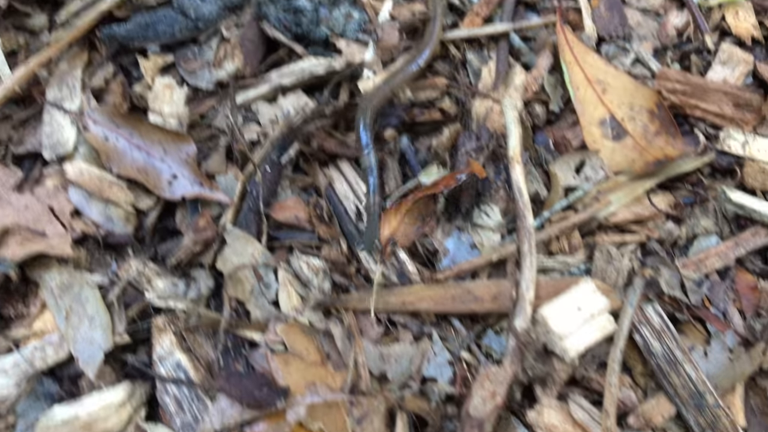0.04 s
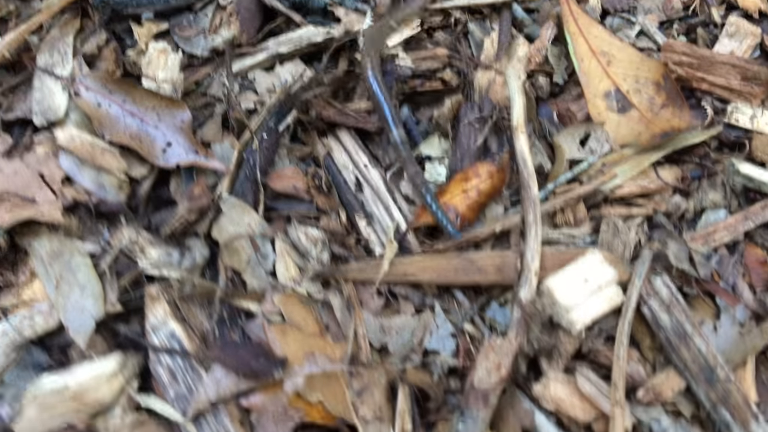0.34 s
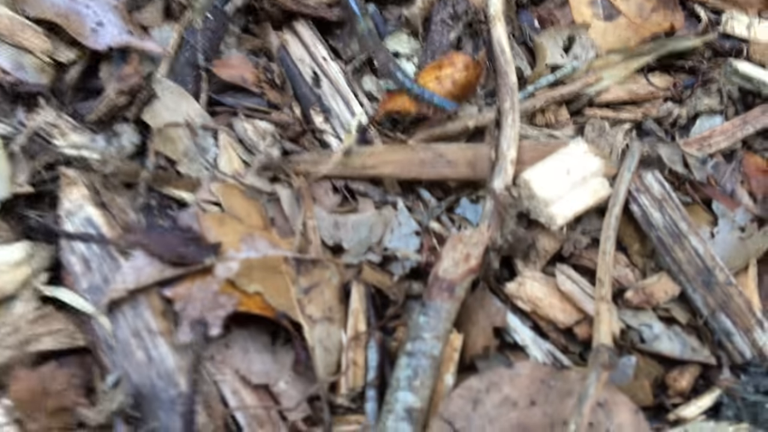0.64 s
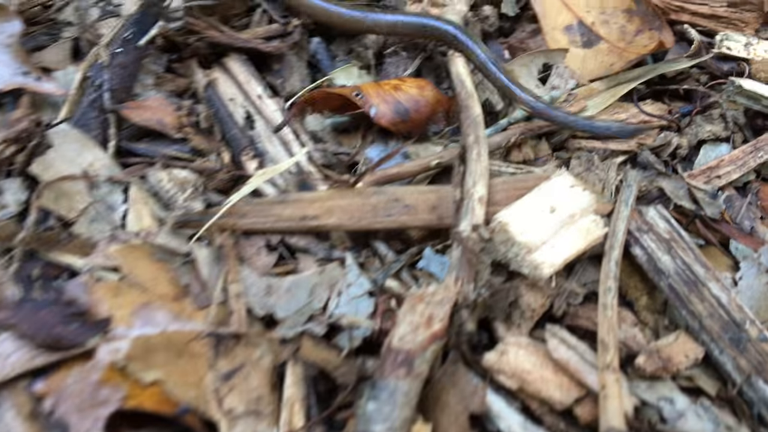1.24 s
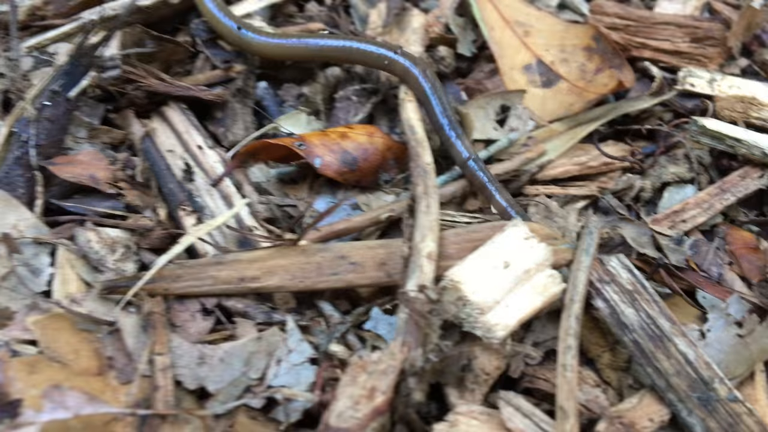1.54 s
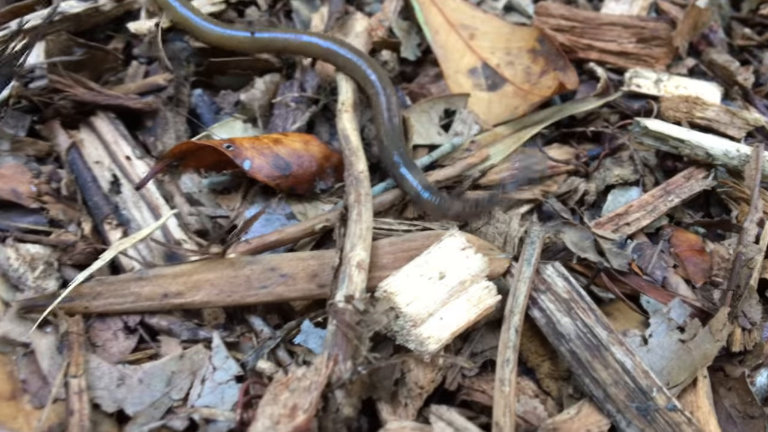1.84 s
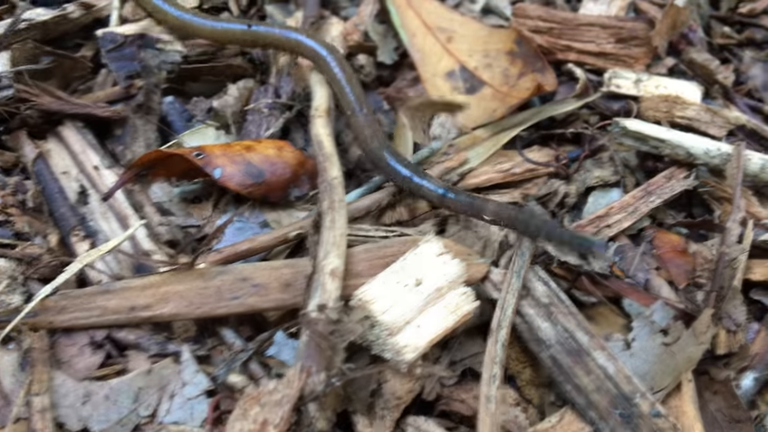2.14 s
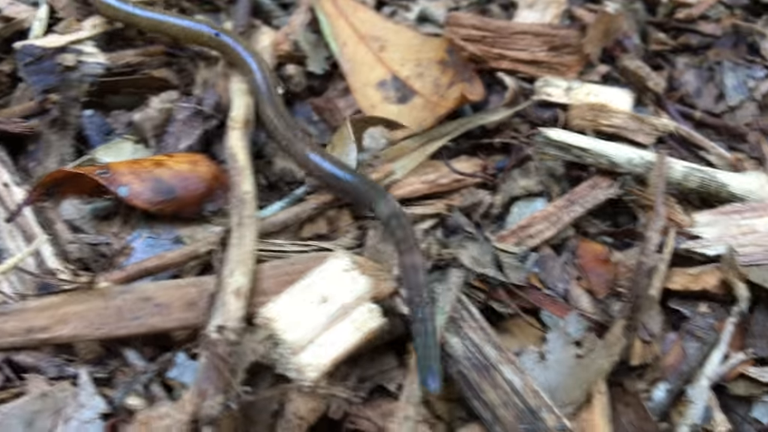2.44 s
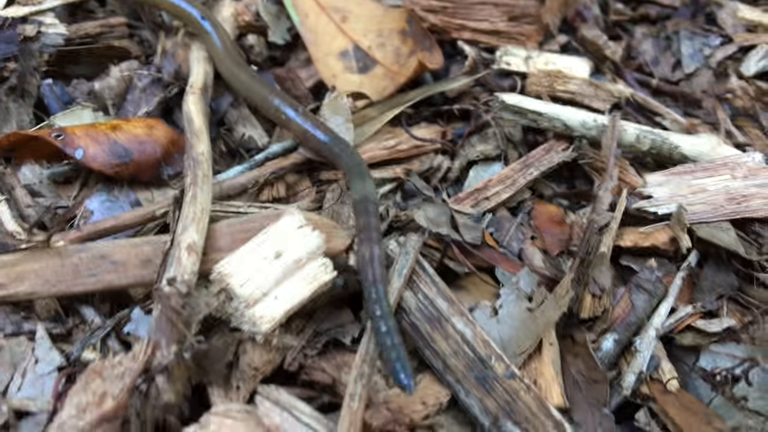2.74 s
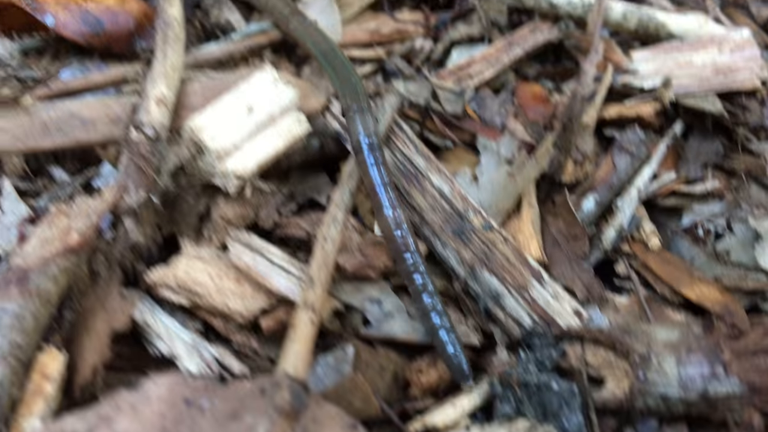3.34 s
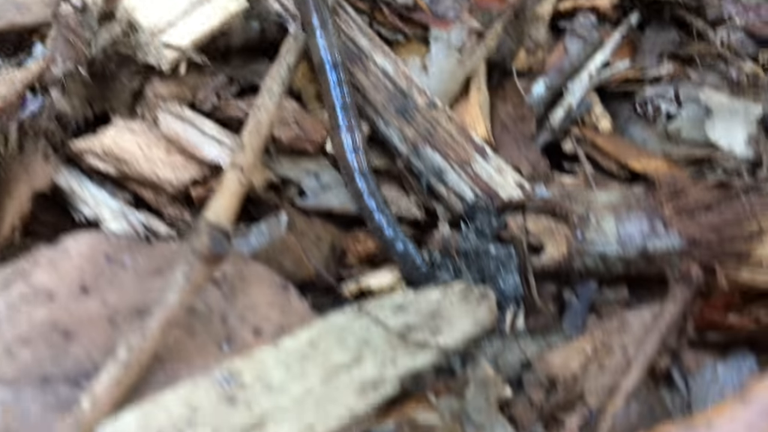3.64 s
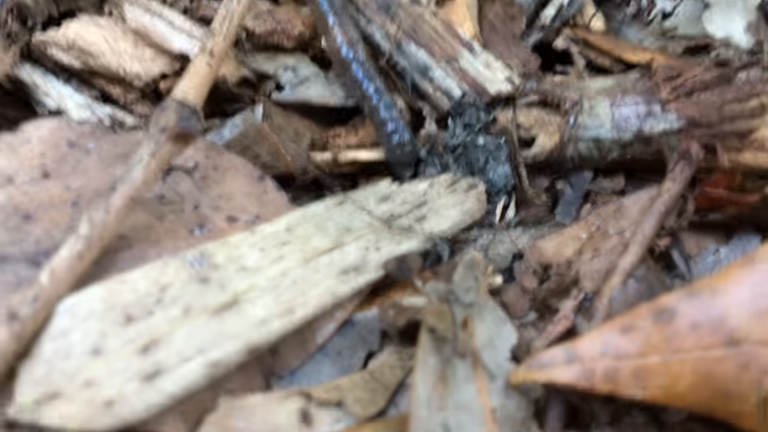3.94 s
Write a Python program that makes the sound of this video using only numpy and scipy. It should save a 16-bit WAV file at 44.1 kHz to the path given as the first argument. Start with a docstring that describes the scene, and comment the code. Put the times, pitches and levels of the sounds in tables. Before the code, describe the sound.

Faint crackles of leaf litter come in short bursts as a small creature crawls over the ground. A few dull clicks from the grip land close to the microphone early on, and far traffic slowly swells with a wavering engine drone.

```python
"""Dry leaves and wood chips tick and rustle faintly, in short bursts, under a thin, snake-like crawler:
stiff edges snap, and sliding leaves catch and slip. Close up, the grip on a hand-held camera slips
and knocks a few dull clicks out of its case. Behind them distant traffic rumbles and slowly swells,
with a wavering engine drone and tyre noise. A soft midrange hiss fades away from the start."""
import sys
import numpy as np
from scipy import signal
from scipy.fft import rfft, irfft
from scipy.io import wavfile

SR = 44100
rng = np.random.default_rng(int(sys.argv[2]) if len(sys.argv) > 2 else 0)


def materialize(psi):
    """Save the field psi as 16-bit PCM at rate SR to the path in sys.argv[1].

    A 1-D psi becomes a single channel; in a 2-D psi each row is a channel.
    """
    bounded = np.clip(np.atleast_2d(psi).T, -1, 1)
    quanta = np.round(bounded * 32767).astype(np.int16)
    wavfile.write(sys.argv[1], SR, quanta)


N = 176400
TIME = np.arange(N) / SR

# Single snaps in the leaf litter: start_s, level_db, ring_share (0-1), ring_hz
LEAF_SNAPS = [(0.042, -50, .9, 12500), (0.048, -61, .7, 13000), (.0617, -56, .9, 12800),
              (.0864, -56, .9, 12800), (.1452, -59, .9, 12400), (.1959, -52, .5, 12500),
              (0.2524, -56, .8, 14000), (.622, -61, .8, 13000), (.994, -56, .5, 12000),
              (1.012, -61, .4, 12000), (1.028, -55, .6, 13500), (1.276, -57, .5, 12000),
              (1.5955, -49, .45, 9600), (1.841, -52, 0, 9500), (1.8502, -50, .35, 9500),
              (2.272, -55, .7, 13000), (2.2774, -54, .6, 13000), (2.3059, -58, .8, 14000),
              (2.6121, -47, .68, 12500), (2.7595, -42, .62, 12400), (2.778, -48, .75, 12200),
              (2.7938, -50, .7, 13500), (2.8463, -51, .25, 7000), (2.899, -50, .3, 13000),
              (2.9306, -48.5, .7, 12200), (3.0405, -44, .82, 4200), (3.0435, -50, .8, 14000),
              (3.091, -44.5, .72, 12700), (3.251, -43, .92, 12400), (3.4467, -48, .85, 11500)]
# EQ of a snap's broad crackle: freq_hz, gain_db
CRACKLE_EQ = [(2400, -9), (3700, 0), (5000, 0), (7000, -1), (9600, -4), (10500, -21), (12500, -14),
              (16000, -27)]
def leaf_ticks(t60_s=.007, ring_width_hz=2200):
    """A dry edge or twig snaps: a tiny burst, part broad crackle and part thin ring at its own pitch."""
    t = TIME[:SR // 50]
    crackle, rings = np.zeros(N), np.zeros(N)
    for start_s, level_db, ring_share, ring_hz in LEAF_SNAPS:
        snap = rng.standard_normal(len(t)) * from_db(-60 * t / t60_s)
        snap = from_db(level_db) * snap / np.abs(snap).max()
        ring = resonance(snap, ring_hz, ring_width_hz)
        add(crackle, start_s, (1 - ring_share) * snap)
        add(rings, start_s, ring_share * snap.std() * unit_rms(ring))
    return equalise(crackle, CRACKLE_EQ) + rings


# Short slides of leaf on leaf: start_s, length_s, level_db, crisp_relative_db
LEAF_SLIDES = [(0.95, 0.11, -75.5, -9), (1.834, 0.032, -69, -7), (2.206, 0.23, -73, -15),
               (2.381, 0.05, -67, -23), (2.47, 0.18, -77.5, -13), (2.746, 0.052, -63.5, -5.5),
               (2.785, 0.085, -70.5, -4.5), (2.876, 0.066, -71.5, -3.5), (3.032, 0.024, -71, -5),
               (3.056, 0.04, -69.5, -3.5)]
# EQ of a rustle's body: freq_hz, gain_db
RUSTLE_EQ = [(1500, -2), (3300, 10.5), (5000, 2), (7000, 0), (9500, -8), (10500, -14), (16000, -17)]
# EQ of its crisp top, from stiff leaf edges: freq_hz, gain_db
CRISP_EQ = [(7500, -13), (9500, -6), (10600, -17), (11600, -9), (12300, 2), (13200, -8), (14200, -4),
            (16000, -11)]
def leaf_rustles(clumps_per_s=220, clump_depth_db=3.2):
    """Leaves slide over each other in short swells; they catch and slip, so the grains come in clumps."""
    body, crisp = np.zeros(N), np.zeros(N)
    for start_s, length_s, level_db, crisp_db in LEAF_SLIDES:
        swell = np.sin(np.pi * np.clip((TIME - start_s) / length_s, 0, 1))
        body += from_db(level_db) * swell
        crisp += from_db(level_db + crisp_db) * swell
    slips = np.clip(rng.standard_normal(N), -2, 2)
    clump_db = clump_depth_db * np.interp(TIME * clumps_per_s, np.arange(N), slips)
    clumps = unit_rms(from_db(clump_db))
    return (equalise(body * clumps * leaf_grains(), RUSTLE_EQ)
            + equalise(crisp * clumps * leaf_grains(), CRISP_EQ))


def leaf_grains(per_s=6000, spread_db=3):
    """Tiny fractures of uneven size at random times, at unit RMS."""
    sizes = from_db(spread_db * np.minimum(rng.exponential(1, N), 4))
    signs = rng.choice([-1, 1], N)
    return unit_rms(sizes * signs * (rng.random(N) < per_s / SR))


# Slips of the grip: start_s, level_db, edge_relative_db, edge_cutoff_hz, mid_gain_db
GRIP_SLIPS = [(0.0303, -31, -11, 8700, -1), (0.0616, -32.5, -15.5, 7500, -3), (0.1451, -35, -15, 6400, -4),
              (0.1893, -37, -14, 7200, 2), (0.2487, -37.5, -10.5, 7500, -2),
              (0.5154, -32, -14.5, 10600, -2), (1.5314, -33, -15, 7800, -16),
              (2.2891, -36.5, -21, 10500, -20)]
# EQ of a click's dull body: freq_hz, gain_db
KNOCK_EQ = [(400, -20), (700, -8), (1000, 0), (1400, -0.5), (1800, 2.5), (2350, 0), (2950, -11.5),
            (3500, -11.5), (4400, -21.5), (6000, -29)]
# EQ of its sharp edge: freq_hz, gain_db
EDGE_EQ = [(3000, -8), (3600, -14), (4200, -17), (4800, -23), (5500, 2.5), (6500, 6), (7900, -1),
           (8900, 6.5), (10500, -16), (12300, -21), (14000, -24), (16000, -35)]
# Early reflections off the ground and the hand: nominal_delay_s, gain_db
REFLECTIONS = [(.0009, -14), (.0014, -14), (.0027, -13.5)]
def grip_clicks():
    """Each slip knocks the damped case at another spot: a dull pulse, a sharp edge, near reflections."""
    body, edge, out = impact(KNOCK_EQ), impact(EDGE_EQ), np.zeros(N)
    mids = resonance(body, hz=1400, width_hz=450)
    for start_s, level_db, edge_db, cutoff_hz, mid_db in GRIP_SLIPS:
        knock = body + (from_db(mid_db) - 1) * mids  # scooping the mids hollows the knock
        crack = signal.sosfilt(signal.butter(4, cutoff_hz, fs=SR, output="sos"), edge)
        add(out, start_s, -from_db(level_db) * (knock + from_db(edge_db) * crack))
        for delay_s, gain_db in REFLECTIONS:
            arrival_s = start_s + delay_s * rng.uniform(0.783, 1.133)
            add(out, arrival_s, -from_db(level_db + gain_db) * knock)
    return out


# EQ of the traffic's low rumble: freq_hz, gain_db
RUMBLE_EQ = [(22, -18), (31, -16.5), (40, -14), (50, 0.5), (75, -3.5), (100, -4), (135, -8), (165, -13),
             (200, -15.5), (250, -24), (310, -24), (400, -30), (480, -40)]
# EQ of far tyres and open air: freq_hz, gain_db
TYRE_EQ = [(450, -6.5), (620, -0.5), (800, -3.5), (1050, -1), (1500, -6.5), (2000, -8.5), (2450, -11.5),
           (2900, -17), (3400, -15.5), (4300, -22), (4950, -26.5), (5500, -25.5), (9600, -30),
           (10400, -33.5), (11500, -30), (16000, -36.5)]
def traffic_bed(rumble_db=-44.5, rumble_rise_db_per_s=.67, tyre_db=-60.5, tyre_rise_db_per_s=.52):
    """Rumble and tyre noise swell as far traffic slowly comes nearer; levels are set at mid-scene."""
    from_middle_s = TIME - TIME.mean()
    rumble = equalise(rng.standard_normal(N), RUMBLE_EQ)
    tyres = equalise(rng.standard_normal(N), TYRE_EQ)
    return (from_db(rumble_db + rumble_rise_db_per_s * from_middle_s) * rumble
            + from_db(tyre_db + tyre_rise_db_per_s * from_middle_s) * tyres)


# Fader moves of one engine in the traffic: time_s, level_db
DRONE_FADER = [(0, -54.5), (.35, -44.5), (1.2, -61), (1.6, -51.5), (2.1, -44.5), (2.5, -56.5), (3.1, -46),
               (3.5, -50.5), (3.9, -41.5)]
def engine_drone(pitch_hz=67.84, waver_hz=4):
    """A far engine holds one low, wavering note that surges and sinks."""
    phase = np.angle(signal.hilbert(noise_band(pitch_hz, waver_hz)))
    return fader(DRONE_FADER) * unit_rms(np.cos(phase))


# Fader moves of the upper rumble: time_s, level_db
GROWL_FADER = [(0, -57), (.7, -61), (1.0, -57.5), (1.6, -56.5), (2.4, -57.5), (3.1, -58), (3.5, -57),
               (4.0, -56.5)]
def traffic_growl(low_hz=119.4, high_hz=280):
    """The upper part of the traffic rumble dips early, then builds back up."""
    return fader(GROWL_FADER) * unit_rms(bandpass(rng.standard_normal(N), low_hz, high_hz))


def fading_hiss(start_db=-65.5, fade_db_per_s=5.5):
    """A soft midrange hiss dies away."""
    return from_db(start_db - fade_db_per_s * TIME) * noise_band(hz=1810, width_hz=800)


def from_db(db):
    """Decibels to gain."""
    return 10 ** (np.asarray(db) / 20)


def unit_rms(x):
    """Scale to an RMS of 1."""
    return x / np.sqrt(np.mean(x ** 2) + 1e-20)


def fader(points):
    """Gain curve through (time_s, level_db) points."""
    return from_db(np.interp(TIME, *np.transpose(points)))


def equalise(x, eq):
    """Minimum-phase EQ with skirts of 60 dB per octave; white noise keeps its level."""
    hz, db = np.transpose(eq)
    octave = np.log2(np.maximum(np.arange(N + 1) * SR / (2 * N), 1))
    octaves_outside = np.maximum(np.log2(hz[0]) - octave, 0) + np.maximum(octave - np.log2(hz[-1]), 0)
    skirt_db = np.minimum(60 * octaves_outside, 90)
    gain = unit_rms(from_db(np.interp(octave, np.log2(hz), db) - skirt_db))
    phase = rfft(2 * irfft(np.log(gain))[:N], 2 * N).imag
    return irfft(rfft(x, 2 * N) * gain * np.exp(1j * phase))[:N]


def impact(eq):
    """A 20 ms hit shaped by an EQ, peaking at 1."""
    hit = equalise(signal.unit_impulse(N), eq)[:SR // 50]
    return hit / np.abs(hit).max()


def resonance(x, hz, width_hz):
    """Pass one resonant peak."""
    return signal.lfilter(*signal.iirpeak(hz, hz / width_hz, fs=SR), x)


def bandpass(x, low_hz, high_hz):
    """Keep the band between two edges."""
    return signal.sosfilt(signal.butter(2, [low_hz, high_hz], "band", fs=SR, output="sos"), x + 1e-18)


def noise_band(hz, width_hz):
    """One band of noise at unit RMS; a second of pre-roll settles the filter."""
    return unit_rms(bandpass(rng.standard_normal(N + SR), hz - width_hz / 2, hz + width_hz / 2)[SR:])


def add(out, start_s, sound):
    """Mix a short sound in at its start time."""
    i = max(int(start_s * SR), 0)
    out[i:i + len(sound)] += sound[:max(N - i, 0)]


def scene():
    """Mono mix: small close sounds over far traffic."""
    background = traffic_bed() + engine_drone() + traffic_growl() + fading_hiss()
    foreground = grip_clicks() + leaf_ticks() + leaf_rustles()
    return (foreground + background)[None]


def record(dry, cutoff_hz=15900):
    """A steep low-pass trims the very top."""
    return signal.sosfilt(signal.ellip(12, .1, 80, cutoff_hz, fs=SR, output="sos"), dry)


dry = scene()
out = record(dry)
materialize(out)
```